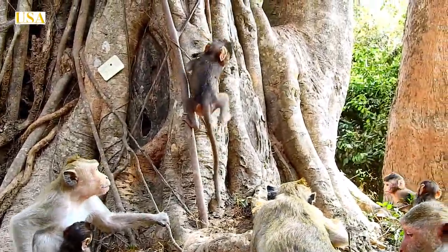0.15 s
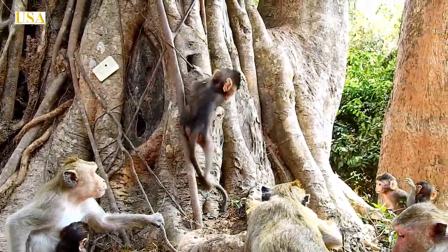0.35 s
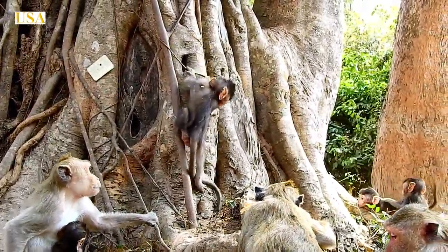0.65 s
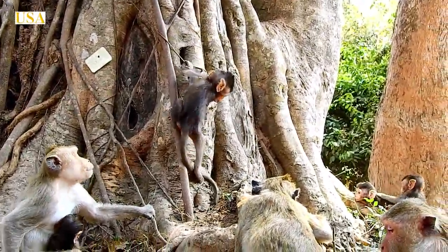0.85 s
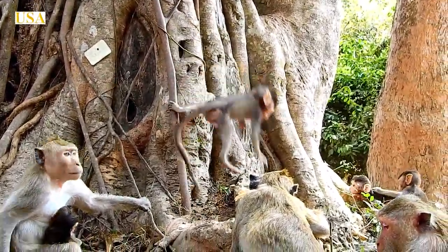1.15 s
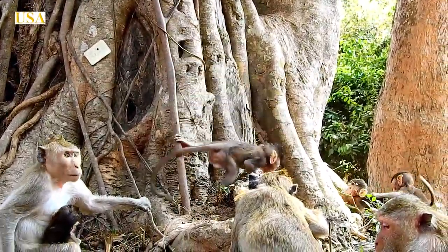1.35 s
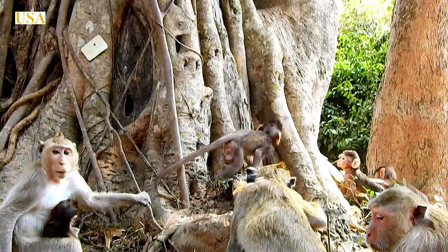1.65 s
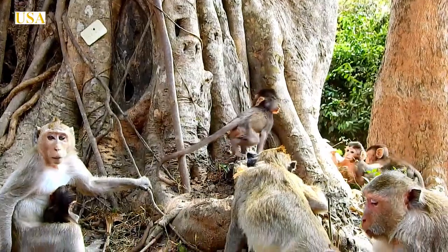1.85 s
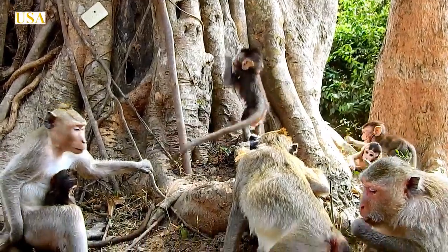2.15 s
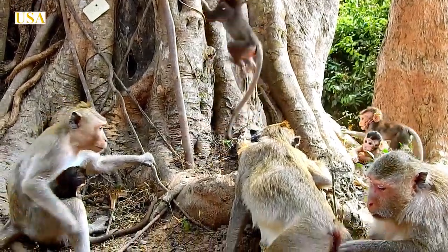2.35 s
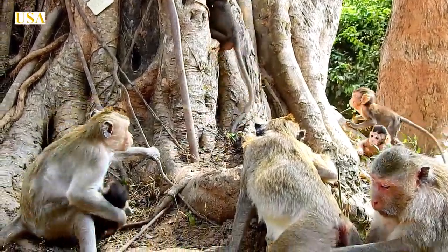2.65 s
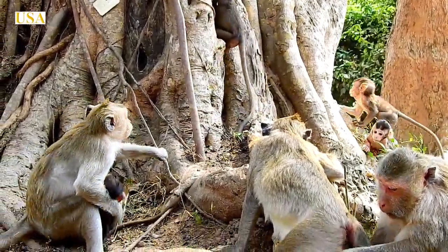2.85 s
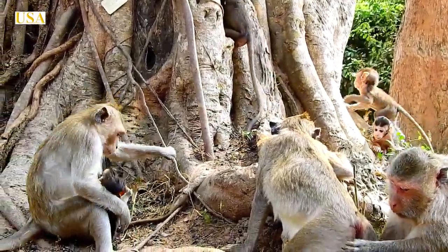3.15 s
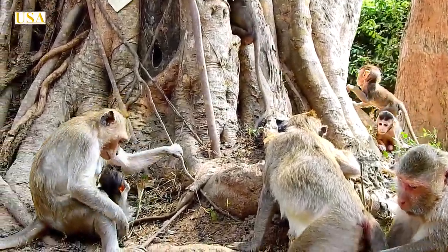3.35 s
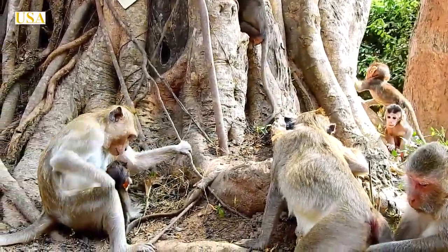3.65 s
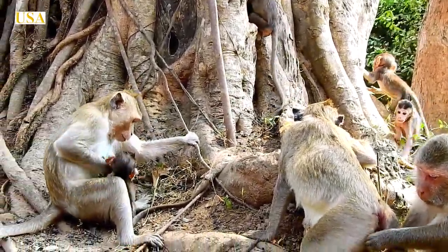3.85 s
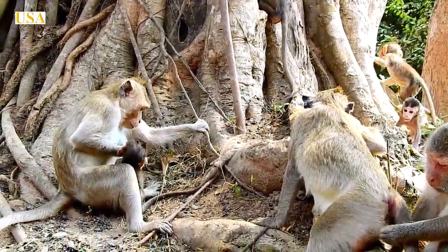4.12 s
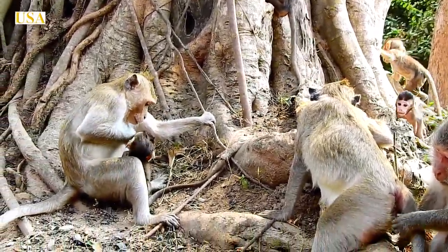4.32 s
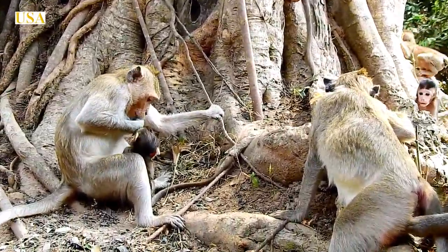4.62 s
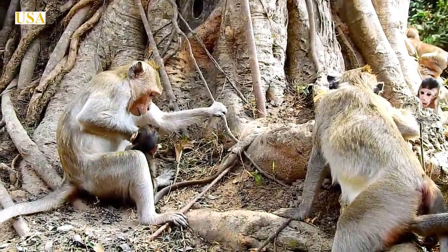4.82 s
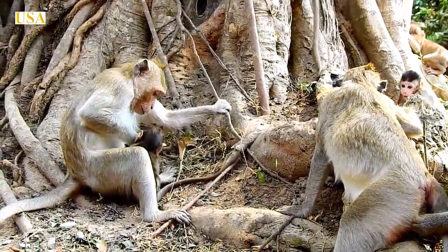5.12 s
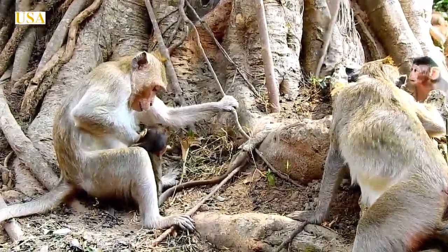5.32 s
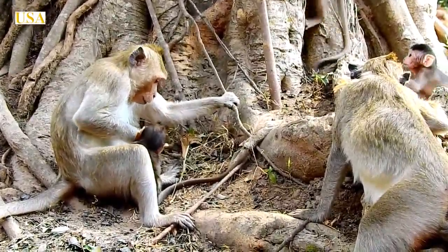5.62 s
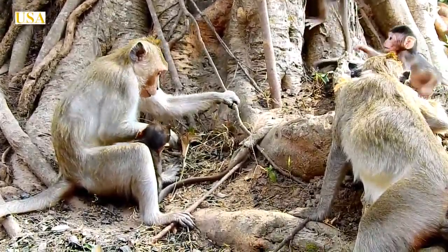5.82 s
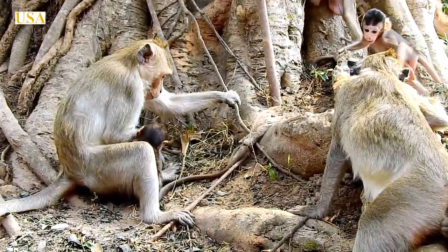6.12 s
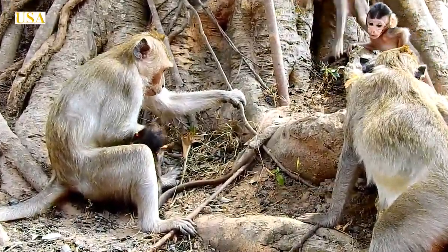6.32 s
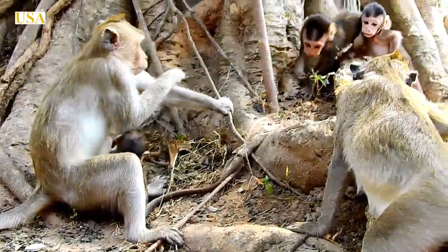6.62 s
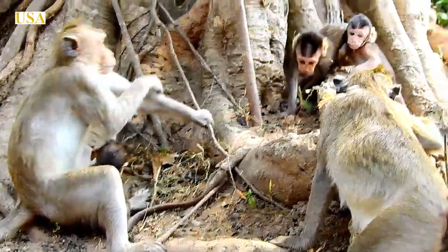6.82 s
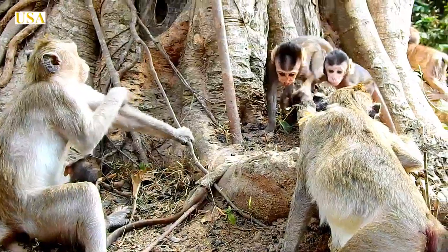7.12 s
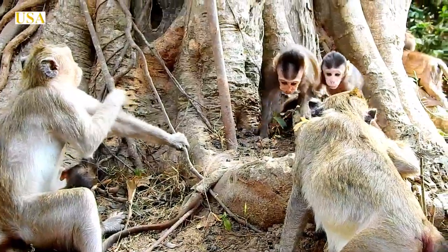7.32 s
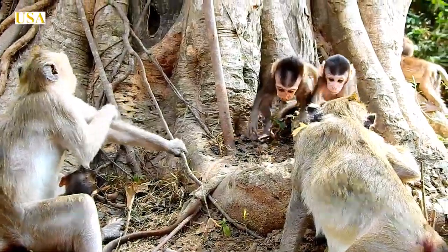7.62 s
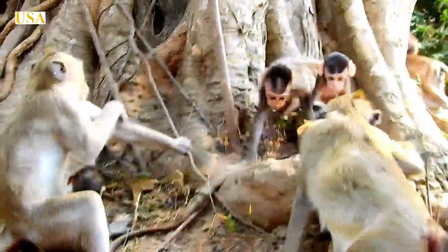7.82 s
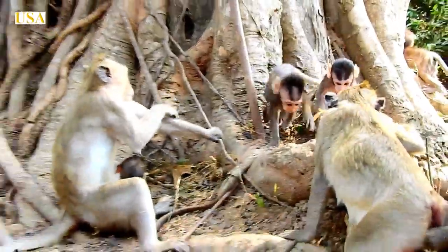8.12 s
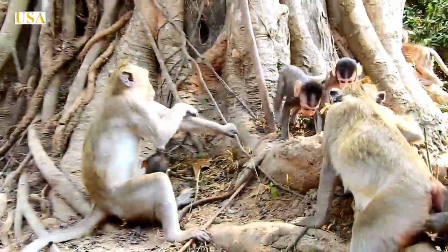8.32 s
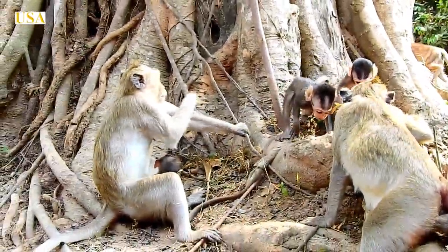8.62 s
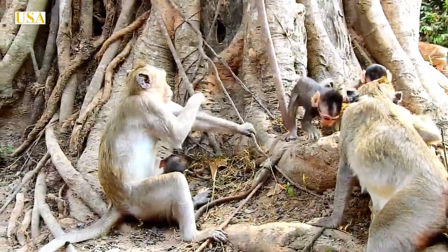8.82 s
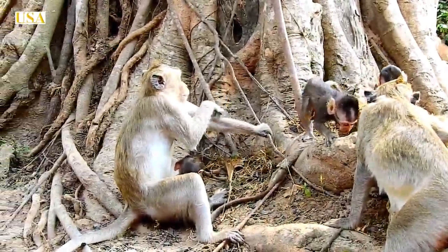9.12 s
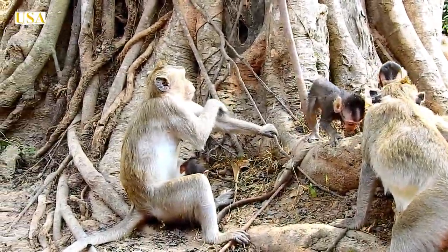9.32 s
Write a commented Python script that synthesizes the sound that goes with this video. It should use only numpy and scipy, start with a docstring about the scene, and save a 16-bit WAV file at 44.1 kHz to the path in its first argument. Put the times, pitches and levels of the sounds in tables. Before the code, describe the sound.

Cicadas buzz and throb throughout as monkeys softly scuff bark and leaves, thump once on a root and sharply snap a twig.

```python
"""A tropical wood, heard through two close microphone ports. Cicadas click their tymbals, ringing
membranes: far off they blur into bands of noise, closer in they swell, chatter and whine, and the
nearest throbs in phrases. Monkeys scuff soil and bark, stir dry leaves and knock on roots; late on
a twig snaps and there is one low hoot. In the distance an idling engine slowly gathers speed."""
import sys
import numpy as np
from scipy import signal
from scipy.fft import rfft, irfft, next_fast_len
from scipy.io import wavfile
from scipy.ndimage import uniform_filter1d, map_coordinates

SR = 44100
rng = np.random.default_rng(int(sys.argv[2]) if len(sys.argv) > 2 else 0)


def dump_mix(stems):
    """Bounce the given channels to the path in sys.argv[1] as a 16-bit WAV at rate SR."""
    frames = np.atleast_2d(stems).T  # one column per channel
    limited = np.clip(frames, -1, 1)  # hard clip at full scale
    pcm = np.round(limited * 32767).astype(np.int16)
    wavfile.write(sys.argv[1], SR, pcm)


N = 417172

# colour of dry leaves and twigs cracking: f/Hz, relative level/dB
CRACKLE_COLOUR = [(600, -55), (1500, -40), (4000, 10), (7000, 15), (9500, 0.5), (12000, -11), (14500, -23),
                  (16000, -21)]
# deep cicadas' band an octave above their lowest: t/s, level/dB
OCTAVE_BAND = [(0.0, -54), (0.42, -53.5), (0.76, -54), (0.97, -50), (1.79, -50.5), (2.13, -49.5),
               (2.26, -49), (3.32, -48.5), (3.42, -48.5), (4.87, -49), (6.19, -50.5), (6.46, -48.5),
               (7.03, -51), (7.69, -49), (8.09, -52), (8.4, -51.5), (8.74, -51.5), (9.46, -50.5)]


def amp(db):
    """Decibels to gain."""
    return 10 ** (np.asarray(db) / 20)


def unit(x):
    """Scaled to rms 1."""
    return x / np.sqrt(np.mean(np.abs(x) ** 2) + 1e-20)


def leftward(db):
    """Stereo gains with the left db above the right."""
    return amp([[db / 2], [-db / 2]])


def along(points, hz):
    """Read (f/Hz, value) points on a log frequency axis."""
    f, value = np.transpose(points)
    return np.interp(np.log(hz + 1), np.log(f + 1), value)


def curves(rows):
    """One value per sample for each column after the time."""
    times, *columns = np.transpose(rows)
    return [np.interp(np.arange(N) / SR, times, column) for column in columns]


def sounding(rows):
    """1 while a table lasts, else 0."""
    return np.interp(np.arange(N) / SR, [rows[0][0], rows[-1][0]], [1, 1], left=0, right=0)


def wobble(rate):
    """A smooth random curve, rate knots a second."""
    return map_coordinates(rng.standard_normal(int(N * rate / SR) + 4), [np.arange(N) * rate / SR])


def filtered(x, response):
    """Filter x by a complex response of frequency."""
    size = next_fast_len(N + 8192)
    return irfft(rfft(x, size) * response(np.fft.rfftfreq(size, 1 / SR)), size)[..., :N]


def rush(colour, patchy_db, grit_db=0):
    """Stereo noise of rms 1 with a colour, patches of random gain and fast grit."""
    likeness = [(30, .92), (60, .98), (150, .98), (350, .94), (800, .86), (2500, .86), (4500, .68),
                (6500, .55), (9000, .55), (15000, .45)]  # how alike the two sides are: f/Hz, correlation
    noise = rng.standard_normal((2, N)) * (amp(grit_db * wobble(900)) if grit_db else 1)
    spectra = signal.stft(noise, nperseg=512)[2]
    patches = uniform_filter1d(rng.standard_normal(spectra.shape[1:]), size=5, axis=0)
    patches = uniform_filter1d(patches, size=10, axis=1)
    pair = signal.istft(spectra * amp(patchy_db * unit(patches)), nperseg=512)[1][:, :N]
    spread = lambda f: np.arccos(along(likeness, f)) / 2
    mid, side = filtered(pair, lambda f: colour(f) * [np.cos(spread(f)), np.sin(spread(f))])
    return unit(np.array([mid + side, mid - side]))


def bands(noise, gains, shapes, breathe_db):
    """Bands cut from one noise, each with its own gain and breathing a few times a second."""
    band = lambda hz, width, steep: lambda f: 1 / (1 + np.abs(2 * (f - hz) / width) ** steep)
    return [gain * amp(breathe_db * wobble(11)) * unit(filtered(noise, band(*shape)))
            for gain, shape in zip(gains, shapes)]


def humps(rows, width_s):
    """Bell-shaped gain peaking at each (t/s, level/dB)."""
    peaks = np.zeros(N)
    for s, db, *_ in rows:
        peaks[round(s * SR)] = amp(db)
    t = np.arange(-SR // 8, SR // 8 + 1) / SR
    return signal.fftconvolve(peaks, np.exp(-.5 * (t / width_s) ** 2), "same")


def strokes(rows, rise_share=.32, range_db=13):
    """Gain for each level of (peak t/s, length/s, level/dB, ..) rows: a quick climb, a slower fall."""
    peak_s, length_s, *levels = np.transpose(rows)
    t = np.arange(0, N, 32) / SR
    since_peak = t - peak_s[:, None]
    away = np.maximum(-since_peak / rise_share, since_peak / (1 - rise_share)) / length_s[:, None]
    shapes = amp(-range_db * away ** 1.08)
    return [np.interp(np.arange(N) / SR, t, amp(db) @ shapes) for db in levels]


def tymbal(hz, clicks_per_s, ring_s, rough, apart, blur):
    """Buckling clicks ring a membrane; rough and apart scatter their phase, blur adds trunk echoes."""
    count = np.cumsum(clicks_per_s * (1 + .03 * wobble(20))) / SR
    clicks = np.flatnonzero(np.diff(np.floor(count)))
    luck = rng.standard_normal((len(clicks), 4))
    phase = rough * luck[:, 1] + apart * luck[:, 2:].T  # shared, plus each side's own
    echoes = rng.standard_normal((2, N)) + 1j * rng.standard_normal((2, N))
    kicks = blur * np.sqrt(clicks_per_s / SR) * echoes
    kicks[:, clicks] += amp(2 * luck[:, 0]) * np.exp(1j * phase)
    pole = np.exp(-1 / (ring_s * SR))
    swing = signal.lfilter([1], np.poly([pole, pole]), kicks)  # swells and dies: t exp(-t / ring_s)
    return unit((swing * np.exp(2j * np.pi * np.cumsum(hz) / SR)).real)


def glide(start_s, length_s, first_hz, last_hz, db, fade_db_per_s, blur):
    """A click-driven note that glides, wavers and fades at both ends."""
    t = np.arange(N) / SR - start_s
    outside_s = np.maximum(0, np.maximum(-t, t - length_s))
    hz = np.interp(t, [0, length_s], [first_hz, last_hz])
    gain = amp(db - fade_db_per_s * outside_s + 1.5 * wobble(5))
    return gain * tymbal(hz, clicks_per_s=108, ring_s=.0016, rough=.8, apart=.3, blur=blur)


def air():
    """The quiet bed of the wood, all round the microphone."""
    bed_colour = [(15, -51), (25, -11), (168, -3), (271, -54), (318, -60), (681, -29), (1450, -7),
                  (1750, 1), (2560, -10), (3000, 3.5), (3900, -30), (6600, -120)]  # still air and far traffic: f/Hz, relative level/dB
    hiss_colour = [(2500, -62), (3900, -3), (4250, 1), (4650, -2), (8000, -20), (10000, -26),
                   (12000, -38.5), (15000, -47), (16000, -62)]  # treble hiss: f/Hz, relative level/dB
    bed = rush(lambda f: amp(along(bed_colour, f)), patchy_db=3)
    hiss = rush(lambda f: amp(along(hiss_colour, f)), patchy_db=2)
    return amp(-62) * bed + amp(-50) * hiss


def far_hum(fade_s=1.63):
    """A distant hum of steady pitch that fades early."""
    partials = [(60, -70.5), (119, -71.5), (179, -76), (238, -105)]  # its tones before the fade: f/Hz, level/dB
    t = np.arange(N) / SR
    hum = sum(amp(db + 2.9 * wobble(1.6)) * np.sin(2 * np.pi * hz * t + .44 * wobble(2.9))
              for hz, db in partials)
    return hum / (1 + (t / fade_s) ** 8)


def far_engine():
    """A far engine gathers speed: shaft orders in step throb once a turn, over a low rumble."""
    shaft = [(0, 25.9), (1.25, 26.8), (3.7, 28.9), (5.9, 29.54), (7.5, 30.07), (9.46, 30.71)]  # turning speed: t/s, f/Hz
    # low hum and rumble, including the thud's boom near 0.6 s: t/s, hum level/dB, rumble level/dB
    low_levels = [(0, -85, -76), (.5, -80, -70.5), (.65, -68, -59), (1.4, -73, -80.5), (2.25, -69.5, -67.5),
                  (2.7, -67, -73), (3.05, -73.5, -72), (3.7, -65.5, -62), (4, -63.5, -62),
                  (4.6, -76.5, -75), (5.1, -65.5, -65), (5.85, -61.5, -65.5), (6.1, -72.5, -77.5),
                  (6.8, -73.5, -69), (7.1, -66.5, -66), (7.7, -69.5, -76), (8.33, -69, -75.5),
                  (8.5, -76.5, -77.5), (9.46, -82, -78)]
    orders = [(1, -38), (2, -8), (3, -13), (4, -5), (5, 0), (6, -3.5), (7, -15.5), (8, -10.5), (9, -8.5),
              (10, -16)]  # shaft harmonics: multiple, relative level/dB
    upper_orders = [(0, 1), (5, 1.5), (7.6, 1.5), (8, -10), (9.46, -6)]  # those above the sixth sink late: t/s, gain/dB
    hum_db, rumble_db = curves(low_levels)
    upper_db, = curves(upper_orders)
    angle = 2 * np.pi * np.cumsum(curves(shaft)[0]) / SR
    hum = sum(amp(db + 1.8 * wobble(4) + upper_db * (k > 6)) * np.cos(k * angle + .3 * wobble(1.5))
              for k, db in orders)
    rumble = rush(lambda f: f ** 5 / (f ** 5 + 52 ** 5) / (1 + (f / 220) ** 3), patchy_db=1.5)
    return amp(hum_db) * hum + amp(rumble_db) * rumble


def hoot():
    """A faint, low, falling hoot, blurred by a husky puff."""
    call = [(8.96, 258, -77), (9.01, 208, -62), (9.06, 180, -58.5), (9.11, 154, -64), (9.17, 142, -69)]  # its course: t/s, f/Hz, level/dB
    hz, db = curves(call)
    rasp = .7 * wobble(45)
    phase = 2 * np.pi * np.cumsum(hz) / SR + rasp
    puff = rush(lambda f: (f > 90) * (f < 300), patchy_db=3.5)
    return sounding(call) * amp(db) * (np.sin(phase) + amp(-16.5) * np.sin(3 * phase) + amp(-6.5) * puff)


def monkeys_moving():
    """Left of centre, feet and hands rub bark and scuff soil; dry leaves swish and crackle."""
    steps = [(.26, 0.062, -69, -84), (.61, 0.095, -76, -63), (1.24, 0.2, -66, -68),
             (1.42, 0.55, -61.5, -92), (2.37, 0.066, -67, -77), (2.61, 0.075, -84, -100),
             (3.05, .2, -69, -86), (3.68, 0.39, -62, -63.5), (3.8, 0.24, -60, -66),
             (3.88, 0.15, -52.5, -62), (3.95, 0.17, -55, -60), (4.005, 0.1, -55, -81),
             (4.65, 0.11, -60, -96), (5.3, 0.23, -64.5, -72), (5.41, 0.2, -61.5, -79),
             (5.98, 0.097, -65, -89), (8.51, 0.078, -72, -101), (7.07, 0.24, -78, -78)]  # feet and hands: peak t/s, length/s, soil level/dB, bark level/dB
    leaves = [(.6, 0.19, -69, -69), (1.41, 0.21, -50, -44), (1.84, 0.38, -59, -75), (2.21, 0.069, -65, -50),
              (2.5, 0.43, -68, -63), (3.05, 0.23, -52.5, -43.5), (3.66, 0.22, -60, -50),
              (3.79, 0.098, -78, -46), (3.9, 0.18, -57, -48), (4.0, .12, -54.5, -44),
              (4.635, 0.14, -44.5, -40.5), (5.29, 0.23, -55, -42), (5.4, 0.12, -67, -51),
              (5.98, 0.14, -61, -47.5), (6.19, .5, -68, -53), (7.06, .3, -62, -68), (8.52, 0.16, -58, -48)]  # stirred leaves: peak t/s, length/s, swish level/dB, crackle level/dB
    stir = [(0, 0.5), (3.3, -0.5), (4.2, 8.5), (5.1, -2), (5.7, -3), (6.3, -5.5), (7.6, -17), (9.46, -24)]  # the troop's fidgeting peaks, then calms: t/s, gain/dB
    fidget = [(-101, 0.079), (-70, 0.93), (-65.5, 1), (-59.5, 0.13)]  # its rub, scuff, swish, crackle: level/dB, share of the stir followed
    friction_bands = [(590, 400, 4), (1150, 850, 4), (2430, 1200, 3)]  # rub, scuff, swish: f/Hz, width/Hz, steepness
    claw = (4, 0.07, 1050, 1400, -46.5)  # a claw drags up bark: t/s, length/s, first f/Hz, last f/Hz, level/dB
    stir_db = curves(stir)[0] + 2 * wobble(6.01)  # in fits and starts
    scuffs, rubs = strokes(steps)
    swishes, crackles = strokes(leaves)
    *gains, crackle_gain = [gain + amp(db + share * stir_db)
                            for gain, (db, share) in zip([rubs, scuffs, swishes, crackles], fidget)]
    friction = rush(np.ones_like, patchy_db=3, grit_db=1.5)
    rub, scuff, swish = bands(friction, gains, friction_bands, breathe_db=.44)
    crackle = crackle_gain * rush(lambda f: amp(along(CRACKLE_COLOUR, f)), patchy_db=2, grit_db=1)
    scrape = glide(*claw, fade_db_per_s=500, blur=1.5)
    return (rub + scuff + scrape) * leftward(3) + swish * leftward(1) + crackle


def wood_knocks(tap_t60_s=.03, attack_s=.0008):
    """Wood rings and dies away, dead centre: dull thuds on a thick root, and short woody taps."""
    landings = [(0.5989, -32.5), (0.6055, -32.5), (1.219, -50)]  # on the root, the first on two feet: t/s, level/dB
    root_modes = [(130, -16, 0.4), (197, -18, 0.25), (425, -6, 0.022), (540, 0, 0.016)]  # its resonances: f/Hz, relative level/dB, t60/s
    taps = [(0.259, -41, 900), (2.35, -46, 860), (3.81, -39, 585), (8.497, -51, 1092), (8.497, -44, 1920)]  # woody taps, the last two the low body of the twig's snap: t/s, level/dB, f/Hz
    rings = [(s, db + mode_db, hz, t60) for s, db in landings for hz, mode_db, t60 in root_modes]
    rings += [(*tap, tap_t60_s) for tap in taps]
    out, t = np.zeros((2, N + SR)), np.arange(SR // 2) / SR
    attack = 1 - np.exp(-t / attack_s)
    for s, db, hz, t60 in rings:
        out[:, round(s * SR):][:, :len(t)] += attack * amp(db - 60 * t / t60) * np.sin(2 * np.pi * hz * t)
    return out[:, :N]


def twig_snap(crack_t60_s=.028, echo_t60_s=.3):
    """A twig breaks in a bright burst of noise and echoes briefly."""
    snaps = [(8.507, -28)]  # the break: t/s, level before colouring/dB
    out, t = np.zeros((2, N + SR)), np.arange(SR // 2) / SR
    decay = amp(-60 * t / crack_t60_s) + amp(-3.5 - 60 * t / echo_t60_s)
    for s, db in snaps:
        out[:, round(s * SR):][:, :len(t)] += amp(db) * decay * rng.standard_normal((2, len(t)))
    return filtered(out[:, :N], lambda f: amp(along(CRACKLE_COLOUR, f) - 15.5))


def far_chorus():
    """Countless cicadas, far back among the trees, merge into six bands of noise."""
    songs = [(1770, 280, 2.45), (3466, 640, 2.35), (5422, 1240, 7.9), (6525, 1090, 4.5), (7190, 410, 2.1),
             (8075, 1130, 2.87)]  # deep, octave, middle, upper, high, shrill: f/Hz, width/Hz, steepness
    deep = [(0, -62), (.26, -64.5), (.37, -57.5), (.66, -61.5), (1.29, -58), (1.45, -52), (1.63, -63),
            (1.74, -53), (2.05, -65), (2.45, -60), (2.62, -60), (2.72, -53), (2.85, -65), (3.0, -60),
            (3.2, -60.5), (3.5, -55), (3.9, -55.5), (4.08, -50.5), (4.3, -57), (4.66, -59), (4.93, -65.5),
            (6.74, -62), (6.9, -68), (7.11, -54.5), (7.2, -64), (7.5, -58.5), (7.63, -68), (7.85, -61),
            (8.09, -58), (8.35, -66), (8.5, -57), (8.62, -64), (9.2, -62), (9.46, -63)]  # 1.8 kHz band of deep cicadas, lifted at moments by rustling: t/s, level/dB
    middle = [(0.0, -51.5, -51.5), (0.53, -48.5, -49.5), (1.74, -49.5, -49), (2.08, -49, -50.5),
              (3.0, -45, -46), (3.42, -48.5, -52.5), (4.0, -46, -46), (4.79, -47, -48), (6.24, -45.5, -42),
              (6.74, -50.5, -48), (7.59, -47, -47), (7.98, -50, -49.5), (9.14, -48.5, -50),
              (9.46, -47, -51.5)]  # steadier singers: t/s, middle level/dB, upper level/dB
    high = [(0, -56, -50), (1.1, -60, -60.5), (1.45, -53, -52), (1.95, -54, -59), (3.1, -58.5, -55),
            (3.95, -50.5, -60), (4.45, -60, -96), (5.2, -77, -69), (7.1, -50.5, -54.5), (7.75, -56, -48),
            (8.7, -69, -56), (9.46, -55, -55.5)]  # these fall silent for a while: t/s, high level/dB, shrill level/dB
    levels_db = curves(deep) + curves(OCTAVE_BAND) + curves(middle) + curves(high)
    return sum(bands(rush(np.ones_like, patchy_db=1.6), amp(levels_db), songs, breathe_db=1.62))


def deep_cicadas():
    """Closer in, deep singers swell in short pulses and two chatter fitfully under the octave band."""
    swells = [(0.118, -51, 3520), (0.232, -51, 3780), (0.486, -47, 3560), (0.878, -49, 3450),
              (0.935, -52, 3410), (1.048, -47, 3400), (1.197, -46.5, 3500), (1.475, -50, 3660),
              (1.29, -49, 3410), (1.572, -45, 3406), (1.6, -48, 3400), (1.761, -47, 3770),
              (1.883, -45, 3375), (2.18, -43.5, 3630), (2.252, -42.5, 3550), (2.471, -47, 3570),
              (2.586, -48, 3500), (2.719, -45, 3400), (2.76, -54, 3336), (2.799, -45, 3367),
              (2.87, -51, 3410), (2.92, -43, 3600), (3.135, -47.6, 3455), (3.198, -45, 3870),
              (3.322, -41.5, 3600), (3.369, -44, 3580), (3.425, -46, 3470), (3.721, -42, 3770),
              (3.792, -48, 3480), (3.971, -50, 3490), (4.166, -45.0, 3800), (4.373, -44, 3580),
              (4.607, -45, 3593), (4.703, -46, 3966), (4.887, -44, 3570), (5.106, -49, 3587),
              (5.31, -47, 3270), (5.424, -45, 3375), (5.643, -49, 3620), (5.723, -45, 3433),
              (5.891, -46.5, 3470), (5.94, -46, 3430), (6.199, -47.5, 3320), (6.354, -43, 3464),
              (6.461, -45, 3300), (6.58, -47, 3480), (6.64, -44.5, 3485), (6.758, -49.5, 3503),
              (6.806, -50, 3970), (6.985, -44, 3420), (7.105, -45, 3504), (7.162, -46, 3430),
              (7.324, -43.5, 3550), (7.595, -43, 3610), (7.702, -49, 3760), (7.798, -43.5, 3450),
              (8.123, -47.6, 3465), (8.264, -48, 3494), (8.314, -45, 3550), (8.51, -46.4, 3524),
              (8.617, -46.5, 3505), (8.739, -43.5, 3520), (8.849, -50, 3424), (8.92, -49.1, 3490),
              (8.992, -46.5, 3420), (9.391, -55, 3380)]  # pulses of song: peak t/s, level/dB, f/Hz
    pitch = curves(swells)[1] + 40.03 * wobble(5)
    song = tymbal(pitch, clicks_per_s=190, ring_s=.0009, rough=1.2, apart=.3, blur=.6)
    out = humps(swells, width_s=.02) * song
    for hz, db in [(3400, -5), (3800, -9)]:
        fits = amp(curves(OCTAVE_BAND)[0] + db + 3.5 * wobble(20))
        pitch = hz + 130 * wobble(14)
        out += fits * tymbal(pitch, clicks_per_s=170, ring_s=.0013, rough=1, apart=.3, blur=.6)
    return out


def lone_cicadas():
    """Single cicadas stand out of the chorus with thin whines; a deep singer gives one falling chirp."""
    whines = [(0, .6, 7950, 7940, -63), (6.75, .6, 7620, 7500, -51), (7.55, .7, 7905, 7890, -54),
              (8.3, .35, 7890, 7885, -61), (6.6, .6, 6750, 6660, -49), (7.05, .5, 5700, 5715, -54)]  # held notes: t/s, length/s, first f/Hz, last f/Hz, level/dB
    chirps = [(.808, .055, 3890, 3370, -46.5)]  # the chirp: same columns
    whining = sum(glide(*row, fade_db_per_s=57, blur=.7) for row in whines)
    return whining + sum(glide(*row, fade_db_per_s=700, blur=.63) for row in chirps)


def near_cicada():
    """The nearest cicada throbs, a little to the left, as its abdomen pumps; its note holds between."""
    throbs = [(3.279, -43), (3.442, -45), (3.63, -38.5), (3.803, -37), (3.968, -35.5), (4.113, -37),
              (4.256, -40), (4.406, -48), (5.145, -45), (5.395, -38), (5.526, -35), (5.664, -40),
              (5.794, -42), (5.93, -38.5), (6.063, -36.5), (6.188, -44), (6.302, -36.5), (6.444, -40),
              (6.558, -41), (6.653, -40.5), (7.147, -41.5), (7.261, -39), (7.397, -37.5), (7.517, -39.5),
              (7.644, -40.1), (7.757, -43), (7.873, -41), (8.088, -43), (8.172, -48), (8.274, -53)]  # pumps of the abdomen: peak t/s, level/dB
    pitch = [(3.25, 6370), (4.2, 6580), (5.1, 6410), (5.9, 6400), (6.1, 6640), (6.6, 6736), (7.4, 6657),
             (8.3, 6390)]  # climbs twice, then sinks through the last phrase: t/s, f/Hz
    held = [(3.3, -57), (3.8, -51), (4.4, -47), (5.1, -48), (6.3, -51), (7.6, -58), (8.2, -62)]  # the note between throbs: t/s, level/dB
    hz, = curves(pitch)
    throb = tymbal(hz, clicks_per_s=245, ring_s=.0008, rough=3, apart=.6, blur=.8)
    note = tymbal(hz, clicks_per_s=245, ring_s=.0011, rough=1.5, apart=.6, blur=.8)
    note_gain = sounding(held) * amp(curves(held)[0])
    return humps(throbs, width_s=.02) * leftward(1.5) * throb + note_gain * note


def scene():
    """The wood as it reaches the microphone ports."""
    cicadas = far_chorus() + near_cicada() + deep_cicadas() + lone_cicadas()
    troop = monkeys_moving() + wood_knocks() + twig_snap()
    return cicadas + troop + hoot() + far_engine() + far_hum() + air()


def record(dry):
    """Close ports shift the treble between sides; a band under 4 kHz passes twice and cuts notches."""
    port_lead = [(6100, 0.06), (7800, 1.46), (10000, 4), (15000, 5.6)]  # from the port spacing: f/Hz, left's phase lead/rad
    notch_hz, late_s, bass_hz, top_hz = 3922, .0101, 45, 15580
    second_pass = lambda f: .8 * np.minimum(f / 3930, 1) ** 9 / (1 + np.clip(f / 4040, 0, 2) ** 150)
    comb = lambda f: 1 - second_pass(f) * np.exp(-2j * np.pi * (f - notch_hz) * late_s)
    lead = lambda f: np.exp(.5j * np.outer([1, -1], along([(4000, 0), *port_lead], f)))
    passband = lambda f: f ** 2 / (f ** 2 + bass_hz ** 2) * (f < top_hz)
    return filtered(dry, lambda f: comb(f) * lead(f) * passband(f))


dry = scene()
out = record(dry)
dump_mix(out)
```